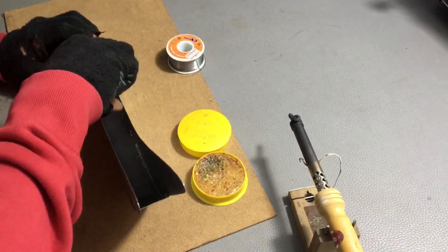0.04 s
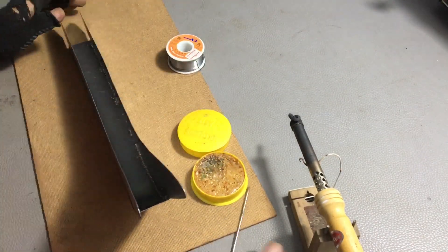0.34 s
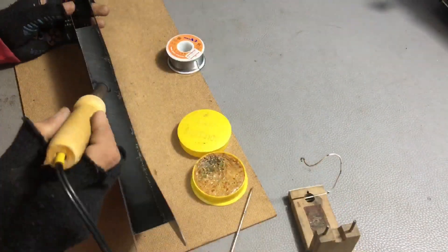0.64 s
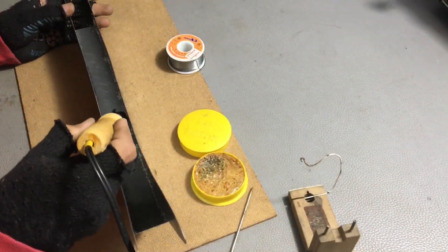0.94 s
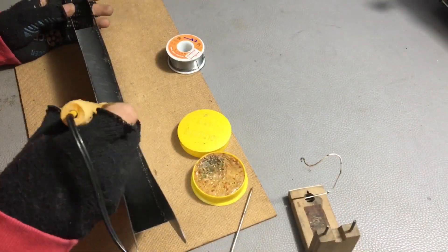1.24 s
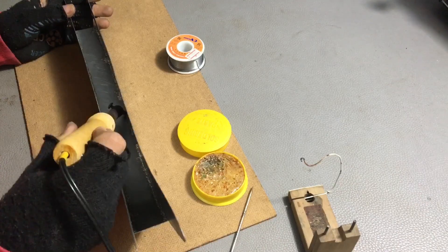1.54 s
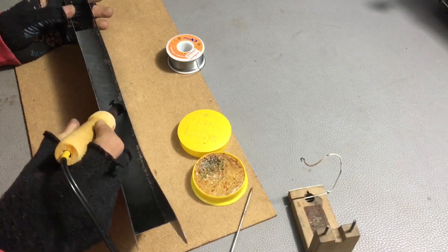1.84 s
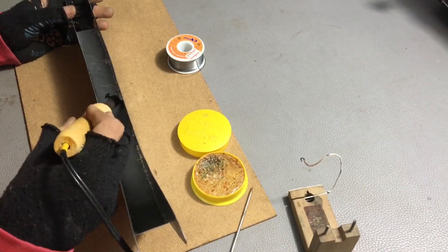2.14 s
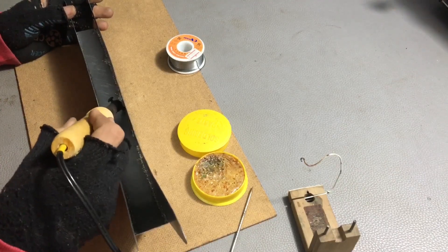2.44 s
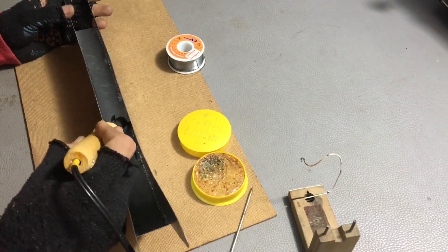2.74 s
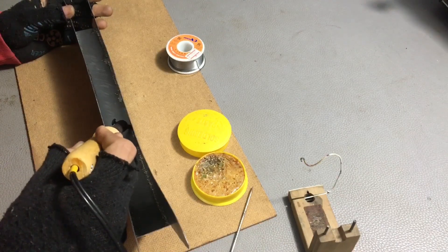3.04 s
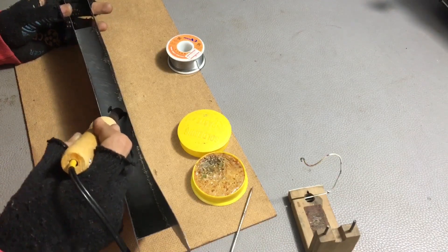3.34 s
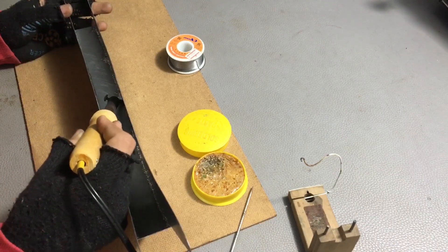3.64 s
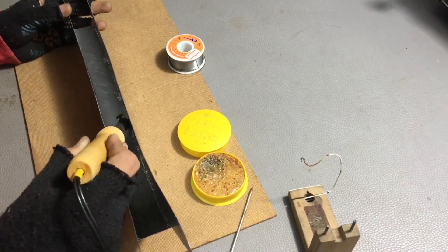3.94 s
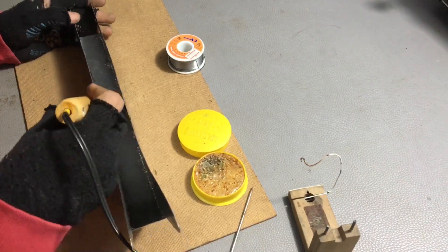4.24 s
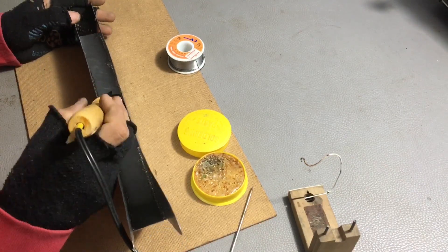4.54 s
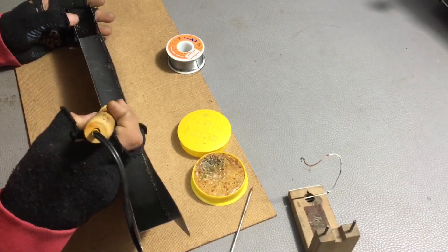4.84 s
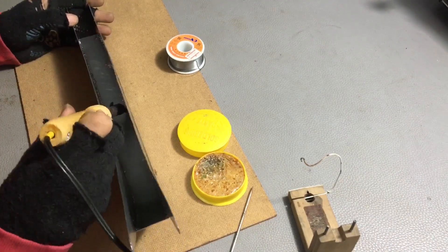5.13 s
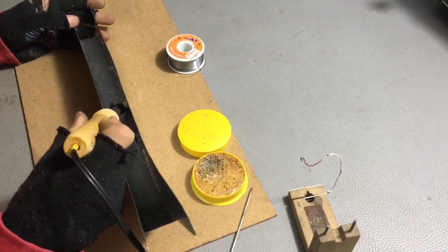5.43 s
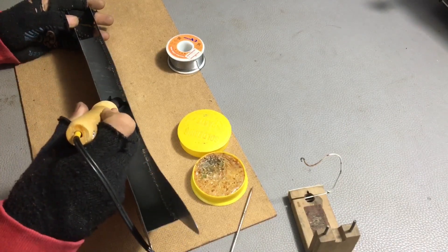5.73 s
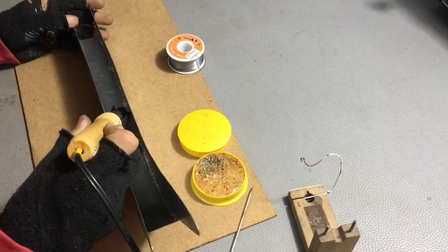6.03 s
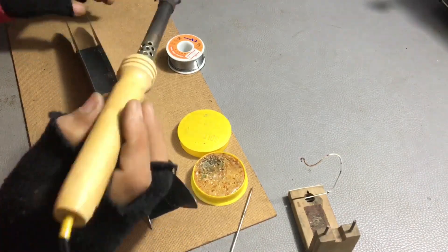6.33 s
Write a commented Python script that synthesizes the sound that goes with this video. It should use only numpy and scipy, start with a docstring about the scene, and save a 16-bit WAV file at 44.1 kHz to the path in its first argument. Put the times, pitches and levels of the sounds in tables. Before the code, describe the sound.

A hot soldering iron pushed through a plastic strip makes short gritty scrapes, thin squeaks and sharp clicks over a faint workshop hum.

```python
"""Short, gritty rasps and thin squeaks: a hot soldering iron is pushed through a plastic strip.
The tip scrapes in and out of the hole and sets the iron's steel barrel ringing; where it sticks and
slips it squeaks, and once, forced through, it squeals. Iron and strip click against each other and
thud on the fibreboard sheet below. Behind it all sits a small workshop's low hum and faint hiss."""
import sys
import numpy as np
from scipy import signal
from scipy.fft import rfft, irfft
from scipy.io import wavfile

SR = 44100
rng = np.random.default_rng(int(sys.argv[2]) if len(sys.argv) > 2 else 0)


def wrap_up_sound(samples):
    """Save the sound to the file named by the first command line argument, as 16-bit audio."""
    columns = np.atleast_2d(samples).T
    # keep every value between -1 and 1, then stretch to whole-number steps
    tamed = np.clip(columns, -1, 1)
    steps = np.round(tamed * 32767).astype(np.int16)
    wavfile.write(sys.argv[1], SR, steps)


N = 285768

# Strokes of the tip, mostly in quick back-and-forth runs.
# Each row: peak time in seconds, level in dB, half length in seconds.
TIP_STROKES = [(.009, -53, 0.015), (0.05, -45.5, 0.011), (0.14, -48.5, .011), (0.46, -58, .013),
               (.66, -59, .06), (0.8, -41, 0.018), (0.846, -45, 0.021), (.89, -54, 0.022),
               (0.995, -52, .016), (1.131, -44.5, 0.0081), (1.19, -42, 0.011), (1.228, -41.5, 0.013),
               (1.267, -36.5, 0.016), (1.301, -55, 0.013), (1.342, -45.5, 0.014), (1.45, -49, 0.011),
               (1.483, -45.5, 0.018), (1.66, -48.5, 0.013), (1.759, -40, 0.014), (1.8, -48.5, .02),
               (1.833, -51.5, 0.014), (1.87, -43, 0.014), (1.968, -43.5, .016), (2.031, -44, .012),
               (2.076, -43, 0.018), (2.125, -38.5, 0.014), (2.162, -43.5, 0.021), (2.241, -53, 0.034),
               (2.537, -43, 0.023), (2.602, -38.5, 0.015), (2.641, -41.5, 0.015), (2.753, -41, 0.012),
               (2.837, -48, 0.017), (2.955, -59.5, 0.016), (3.029, -52.5, 0.0093), (3.225, -41, 0.017),
               (3.274, -43, .018), (3.318, -44, 0.016), (3.363, -39.5, .014), (3.401, -48.5, 0.015),
               (3.542, -38.5, .011), (3.67, -63.5, 0.013), (3.745, -55, .022), (3.869, -53, .032),
               (3.94, -40.5, .013), (3.959, -36.5, .015), (4.165, -37, .011), (4.211, -32, 0.011),
               (4.282, -40, 0.011), (4.438, -51, 0.011), (4.63, -48, .014), (4.692, -45, 0.012),
               (4.742, -53.5, 0.0059), (4.887, -51.5, 0.028), (5.04, -50.5, 0.021), (5.098, -56.5, 0.03),
               (5.146, -39.5, .012), (5.19, -50, 0.027), (5.292, -55, 0.019), (5.333, -51.5, 0.015),
               (5.385, -44.5, .018), (5.422, -41, 0.012), (5.583, -50.5, 0.0071), (5.868, -61, 0.01),
               (5.946, -50.5, 0.012), (6.067, -48.5, 0.011), (6.279, -58, 0.026), (6.462, -53, 0.0086)]
# Brightness of a usual stroke. Each row: time in seconds, treble gain in dB.
STROKE_TREBLE = [(0, -3), (.85, 0.5), (1.11, -14), (1.21, -8), (1.28, 1), (2.2, 0.5), (2.7, -1), (3.4, -1),
                 (4.2, -1.5), (5.2, -5), (6.4, -0.5)]
# Short squeaks. Each row: start and end in seconds, middle pitch in Hz, glide and arch as shares of
# the pitch, fundamental in dB, octave in dB, fall per further harmonic in dB.
SHORT_SQUEAKS = [(0, 0.04, 1210, -0.19, 0.036, -54.5, -52, 10),
                 (.055, 0.134, 1244, -0.072, 0.18, -45.5, -52, 11),
                 (0.547, 0.624, 4000, 0.037, .03, -67, -66, 13),
                 (0.617, 0.656, 4310, 0.063, 0.039, -59.5, -65, 12),
                 (0.663, 0.728, 4370, -0.036, 0.058, -62, -62.5, 8),
                 (2.452, 2.528, 1996, -0.11, 0.027, -61, -56, 2.2),
                 (2.698, 2.746, 1810, -.1, -.05, -66.5, -60, 5),
                 (2.76, 2.84, 1880, -0.18, 0.038, -64.5, -56, 4.5),
                 (2.967, 3.009, 2537, .02, 0.1, -53.5, -58.5, 9.8),
                 (4.237, 4.288, 2250, -0.078, 0.062, -51, -44, 8.8),
                 (4.305, 4.34, 1843, 0.11, 0, -63, -65.5, 9),
                 (4.481, 4.523, 1733, 0.25, .04, -65.5, -66, 3.3),
                 (4.539, 4.615, 1795, -0.36, 0.077, -67, -57.5, 4.8),
                 (4.945, 4.979, 2250, .03, 0.049, -52, -69, 3),
                 (5.181, 5.215, 2374, 0.1, 0.017, -55.5, -46, 7),
                 (5.545, 5.578, 2410, 0.23, .15, -56.5, -49.5, 10),
                 (5.593, 5.618, 1980, -0.16, -0.01, -62.5, -49, 9.8),
                 (5.953, 6.029, 2090, 0, -0.016, -56.5, -59.5, 7.8),
                 (6.12, 6.147, 2190, 0.12, 0.15, -65, -64, 7.6)]
# The long squeal. Each row: time in seconds, pitch in Hz, fundamental and overtones in relative dB.
SQUEAL_PATH = [(4.089, 2420, -41, -50), (4.1, 2150, -49, -28.5), (4.119, 2008, -46.5, -35),
               (4.139, 2185, -44, -31.5), (4.146, 2107, -42, -53), (4.16, 2202, -40.5, -68),
               (4.182, 2227, -41, -61), (4.205, 2097, -46.5, -68), (4.22, 2040, -38.5, -70)]
# Iron against strip. Each row: start in seconds, force in dB, hardness from 0 (plastic) to 1 (steel),
# chatter decay in seconds.
CONTACT_CLICKS = [(0.127, -33.5, 0.23, .0012), (.306, -17, 0.66, 0.0032), (.32, -25, 0.47, 0.0041),
                  (.423, -33.5, 0, 0.0038), (.498, -32, 0.61, .0016), (.508, -27, .55, .0014),
                  (0.52, -24.5, 0.7, 0.0011), (0.717, -25, 0.87, 0.0067), (0.73, -18.5, 0.86, 0.0014),
                  (1.147, -17, 0.68, 0.0015), (1.253, -30.5, 0.73, 0.0045), (1.943, -33.5, 0.63, 0.0042),
                  (2.061, -37, 0.91, 0.0025), (2.197, -39.5, 0.86, 0.005), (2.359, -19.5, 0.69, .0022),
                  (2.466, -30.5, 0.52, .001), (3.21, -31.5, 0.8, 0.015), (3.93, -33.5, 0.98, .0045),
                  (4.062, -21.5, .95, 0.0054), (4.069, -13, 0.77, 0.0043), (4.217, -15, 0.77, 0.0022),
                  (4.287, -37, .5, .004), (4.357, -36.5, 0.47, .008), (4.692, -32.5, 0.31, .006),
                  (4.945, -30, 0.82, .004), (5.001, -33, 0.47, 0.011), (5.144, -33.5, 0.99, 0.0037),
                  (5.231, -35, 0.51, .004), (5.786, -44.5, 0.44, .012), (6.187, -25, 0.79, 0.0053),
                  (6.199, -30, 1, 0.0073)]
# Knocks on the board. Each row: start in seconds, force in dB, centre in Hz.
BOARD_THUDS = [(.308, -38, 630), (.402, -38.5, 524), (.424, -31, 560), (.428, -32, 393), (.731, -35, 400),
               (1.148, -37.5, 406), (2.356, -39.5, 442), (3.543, -40.5, 414), (4.068, -31, 400),
               (4.218, -38, 394), (4.286, -35.5, 381), (4.692, -35.5, 400), (5.001, -27, 560),
               (5.145, -35, 337), (5.231, -42, 576), (5.423, -38.5, 354), (5.749, -45, 596)]
# Brief high pings of the iron. Each row: start in seconds, pitch in Hz, level in dB, T60 in seconds.
IRON_PINGS = [(.7305, 8800, -22, 0.018), (4.067, 9300, -23, 0.038), (5.003, 4480, -48.5, .054),
              (6.187, 5790, -45, .14), (6.189, 8430, -29, 0.028), (6.189, 12050, -32, 0.078),
              (6.199, 13400, -30, 0.051), (6.223, 3460, -49, .04), (6.272, 7540, -52, 0.13),
              (6.304, 3070, -51.5, 0.083)]
# Modes of steel barrel, plastic strip and fibreboard.
# Each row: frequency in Hz, width in Hz, relative level in dB.
BARREL_MODES = [(3625, 58, 2), (3926, 420, -3), (4294, 240, -11.5), (4570, 150, -7.5), (4925, 103, -2.5),
                (5350, 310, -4), (5880, 170, -2.5), (6170, 160, -4.5), (6756, 55, -5), (7654, 94, -7),
                (7776, 130, 0.5), (7970, 280, -12), (7940, 41, -10), (8480, 330, -2.5), (8850, 120, -14),
                (9230, 240, 5), (9750, 160, -8), (10100, 37, -21), (10350, 49, 3), (10820, 440, -7.5),
                (11640, 150, -2), (12130, 160, -1.5), (12800, 300, 0), (13330, 67, -17), (14000, 560, -0.5),
                (14700, 78, -5), (15730, 320, 7.5)]
STRIP_MODES = [(1159, 86, -2.5), (1489, 256, 1.5), (1847, 410, -4.5), (2037, 290, -15.5), (2940, 1380, 0.5)]
BOARD_MODES = [(244, 290, 10.5), (359, 69, 10.5), (449, 31, -1), (620, 33, 6.5)]
# Light rubbing under the strokes. Each row: time in seconds, relative force in dB.
RUB_FORCE = [(0, -53), (.25, -67), (.6, -61.5), (.76, -78), (.96, -57), (1.25, -81.5), (1.58, -61.5),
             (1.85, -74), (2.2, -64), (2.5, -76), (2.85, -64), (3.12, -83), (3.37, -65), (3.8, -64),
             (4.25, -64), (4.7, -72), (5.07, -56.5), (5.5, -69.5), (6.48, -70.5)]
# The room's murmur and hiss. Each row: frequency in Hz, relative spectral level in dB.
AIR_SPECTRUM = [(30, -50), (80, -34), (110, -36.5), (160, -10), (220, 1), (320, -4), (440, 0), (600, -10),
                (750, -17.5), (1150, -20.5), (1600, -24), (8000, -24), (16000, -25.5)]
# The wavering hum. Each row: pitch in Hz, width in Hz, relative level in dB.
HUM_TONES = [(256.2, 20, 3), (416, 20.3, 8.5), (459, 11.7, 5.5)]
# Rise and fall of the low room tone. Each row: time in seconds, relative level in dB.
ROOM_SWELL = [(0.0, -55.5), (0.83, -60), (1.12, -57), (2.89, -59.5), (5.0, -55.5), (5.18, -54), (5.63, -56),
              (6.1, -55), (6.48, -57)]


def strokes(usual_db=-44.5, treble_hz=9200, top_hz=14260, board_db=-21.5):
    """Each scrape swells and fades with the tip's speed; gives forces on board, strip and barrel."""
    forces = np.zeros((3, N))
    split = signal.butter(4, treble_hz, fs=SR, output="sos")
    for s, db, half in TIP_STROKES:
        # a stronger stroke is brighter, and more of it goes into the barrel
        effort_db = db - usual_db
        bright_db = np.interp(s, *np.transpose(STROKE_TREBLE)) + .43 * effort_db
        strip_db = -8.5 - .48 * effort_db
        at = np.arange(max(0, int((s - 2 * half) * SR)), min(N, int((s + 2 * half) * SR)))
        speed = from_db(db) * np.exp(-2 * np.abs((at / SR - s) / half) ** 1.77)
        rasp = friction(len(at), grain_db=2)
        dull = signal.sosfiltfilt(split, rasp)
        coloured = dull + from_db(bright_db) * (rasp - dull)
        on_barrel = rms_one(cut(coloured, top_hz, "low", order=4))
        forces[:, at] += speed * np.array([from_db(board_db) * rasp, from_db(strip_db) * rasp, on_barrel])
    return forces


def friction(size, grain_db):
    """Tiny slips of uneven strength make a grainy noise."""
    return rms_one(rng.standard_normal(size) * from_db(grain_db * drift(size, rate_hz=215)))


def squeaks(usual_db=-54, usual_rough=.13, harmonics=8):
    """Each short squeak glides and arches in pitch with the tip's speed."""
    out = np.zeros(N)
    for start, end, middle_hz, glide, arch, low_db, octave_db, fall_db in SHORT_SQUEAKS:
        at = np.arange(int(start * SR), int(end * SR))
        along = np.linspace(-1, 1, len(at))
        hz = middle_hz * (1 + glide * along / 2 - arch * along ** 2)
        levels = [low_db] + [octave_db - fall_db * k for k in range(harmonics - 1)]
        # a faint squeak barely locks in, so it is rougher
        rough = usual_rough * np.exp(.1 * (usual_db - max(low_db, octave_db)))
        tone = stick_slip(hz, levels, rough, jitter=.012, flutter_db=4)
        out[at] += tone * signal.windows.tukey(len(at), .38)
    return out


def long_squeal(gain_db=1, octave_db=-43.5, fall_db_per_octave=16):
    """Shrill while the tip is forced, then mellow as the plastic gives."""
    times, *columns = np.transpose(SQUEAL_PATH)
    at = np.arange(int(times[0] * SR), int(times[-1] * SR))
    hz, low_db, upper_db = (np.interp(at / SR, times, column) for column in columns)
    overtones = [upper_db - 1.5 - fall_db_per_octave * np.log2(k / 3) for k in range(3, 8)]
    tone = stick_slip(hz, [low_db, octave_db] + overtones, rough=.08, jitter=.0067, flutter_db=2.5)
    out = np.zeros(N)
    out[at] = from_db(gain_db) * tone * signal.windows.tukey(len(at), .08)
    return out


def stick_slip(hz, levels, rough, jitter, flutter_db):
    """The tip sticks and slips periodically; uneven slips smear each harmonic."""
    size, tone = len(hz), 0
    phase = 2 * np.pi * np.cumsum(hz * (1 + jitter * drift(size, rate_hz=118))) / SR
    for k, db in enumerate(levels, 1):
        smear_hz = 300 * np.sqrt(k)
        rasp = drift(size, smear_hz) + 1j * drift(size, smear_hz)
        partial = np.real((1 + rough * rasp) * np.exp(1j * k * phase)) / np.sqrt(.5 + rough ** 2)
        gain = from_db(db + flutter_db * drift(size, rate_hz=53))
        tone = tone + gain * partial * (k * hz < SR / 2)
    return tone


def clicks(snap_s=.0026, soft_hz=1780, hard_hz=15700, swing_db=23.5):
    """A sharp first contact, then a dying chatter of little blows; gives forces on strip and barrel."""
    forces = np.zeros((2, N))
    t = np.arange(SR // 20) / SR
    for s, db, hardness, chatter_s in CONTACT_CLICKS:
        rattle = np.sign(rng.standard_normal(len(t))) * np.exp(-t / chatter_s)
        contact = signal.unit_impulse(len(t)) * np.linalg.norm(rattle)
        # the shorter the chatter, the more of the blow is in the first contact
        share = np.exp(-chatter_s / snap_s)
        blow = np.sqrt(share) * contact + np.sqrt(1 - share) * rattle
        # a softer contact is duller and shakes the strip more than the barrel
        edge_hz = soft_hz + (hard_hz - soft_hz) * hardness ** 1.35
        gains = from_db(db - swing_db * np.array([[hardness], [1 - hardness]]))
        start = int(s * SR)
        forces[:, start:start + len(t)] += gains * cut(blow, edge_hz, "low", order=3)
    return forces


def thuds(settling_s=.0064, push=.99):
    """A soft push and the strip's settling; where it lands decides which board modes are fed most."""
    force = np.zeros(N)
    t = np.arange(SR // 12) / SR
    for s, db, hz in BOARD_THUDS:
        shuffle = rng.standard_normal(len(t)) * np.exp(-t / settling_s)
        blow = shuffle + push * np.linalg.norm(shuffle) * signal.unit_impulse(len(t))
        start = int(s * SR)
        force[start:start + len(t)] += from_db(db) * resonate(blow, hz, width_hz=140) / np.hypot(1, push)
    return force


def pings():
    """Single decaying modes of the iron: the bright ring of hard clicks, and a few faint rings."""
    out = np.zeros(N)
    t = np.arange(SR // 8) / SR
    for s, hz, db, t60 in IRON_PINGS:
        start = int(s * SR)
        out[start:start + len(t)] += from_db(db - 60 * t / t60) * np.sin(2 * np.pi * hz * t)
    return out


def body(force, modes, crack_db, crack_hz, wander_db, min_width_hz=55):
    """The contact's direct crack plus ringing modes, fed unevenly as the contact point moves."""
    out = from_db(crack_db) * cut(force, crack_hz, "high", order=3)
    power = from_db(crack_db) ** 2
    hop = 100  # samples per coupling step
    steps = np.arange(N) / hop
    for hz, width_hz, db in modes:
        width_hz = max(width_hz, min_width_hz)  # a minimum width keeps every ring short
        # each mode's coupling changes about twenty times a second
        coupling = from_db(db + wander_db * drift(N // hop + 2, rate_hz=20 * hop))
        drive = force * np.interp(steps, np.arange(len(coupling)), coupling)
        out = out + resonate(drive, hz, width_hz)
        power += from_db(db) ** 2 * np.pi * width_hz / SR
    return out / np.sqrt(power)


def workshop_reverb(x, t60_s=.064, build_s=.00032):
    """A short, diffuse tail from the bench and near walls."""
    t = np.arange(SR // 3) / SR
    tail = rng.standard_normal(len(t)) * from_db(-60 * t / t60_s) * (1 - np.exp(-t / build_s))
    tail = cut(tail, hz=8600, kind="low", order=1)
    return signal.oaconvolve(x, tail / np.linalg.norm(tail))[:N]


def room_tone(air_db=-58, hum_db=-62):
    """A low murmur and a wavering hum swell together under an even hiss."""
    air_hz, shape_db = np.transpose(AIR_SPECTRUM)
    bins_hz = np.maximum(np.arange(N // 2 + 1) * SR / N, 1)
    spectrum = from_db(np.interp(np.log(bins_hz), np.log(air_hz), shape_db))
    air = from_db(air_db) * rms_one(irfft(rfft(rng.standard_normal(N)) * spectrum, N))
    t = np.arange(N) / SR
    hum = sum(from_db(db) * drift(N, width / 2) * np.sin(2 * np.pi * hz * t)
              for hz, width, db in HUM_TONES)
    murmur = cut(air, hz=890, kind="low", order=1)
    hiss = air - murmur
    swell = gain_curve(ROOM_SWELL, mean_db=.52, depth=.96)
    return (murmur + from_db(hum_db) * rms_one(hum)) * swell + hiss


def resonate(x, hz, width_hz):
    """One resonance with a gain of one at its peak."""
    r = np.exp(-np.pi * width_hz / SR)
    feedback = [1, -2 * r * np.cos(2 * np.pi * hz / SR), r * r]
    return signal.lfilter([(1 - r * r) / 2, 0, (r * r - 1) / 2], feedback, x + 1e-18)


def gain_curve(rows, mean_db, depth):
    """A fader ride through rows of seconds and dB, re-centred on mean_db, its swing scaled by depth."""
    db = np.interp(np.arange(N) / SR, *np.transpose(rows))
    return from_db(mean_db + depth * (db - db.mean()))


def drift(size, rate_hz):
    """A smooth random wobble with an rms of one."""
    return rms_one(cut(rng.standard_normal(size + SR // 4), rate_hz, "low")[SR // 4:])


def cut(x, hz, kind, order=2):
    """Butterworth low- or high-pass."""
    return signal.sosfilt(signal.butter(order, hz, kind, fs=SR, output="sos"), x)


def from_db(db):
    """Decibels to gain."""
    return 10 ** (np.asarray(db) / 20)


def rms_one(x):
    """Scale to an rms of one."""
    return x / np.sqrt(np.mean(x ** 2) + 1e-20)


def scene():
    """Strokes, knocks and rubbing drive three bodies; squeaks sound directly and through the barrel."""
    on_board, on_strip, on_barrel = strokes()
    strip_blows, barrel_blows = clicks()
    rub = gain_curve(RUB_FORCE, mean_db=-70, depth=.99) * friction(N, grain_db=7)
    squeaking = squeaks() + long_squeal()
    on_board = on_board + thuds()
    on_strip = on_strip + strip_blows + from_db(-3) * rub
    # the squeaks' harmonics swell and break as they glide across the barrel's modes
    on_barrel = on_barrel + barrel_blows + rub + from_db(-17) * squeaking
    board = body(on_board, BOARD_MODES, crack_db=-40, crack_hz=600, wander_db=0)
    strip = body(on_strip, STRIP_MODES, crack_db=-11, crack_hz=1550, wander_db=3.5)
    barrel = body(on_barrel, BARREL_MODES, crack_db=-19, crack_hz=4060, wander_db=2.2)
    # each part radiates little outside the range of its modes
    board = cut(board, hz=150, kind="high", order=4)
    board = cut(board, hz=710, kind="low", order=4)
    strip = cut(strip, hz=870, kind="high", order=3)
    barrel = cut(barrel, hz=2534, kind="high", order=4)
    work = board + strip + barrel + squeaking + pings()
    return (work + from_db(-10) * workshop_reverb(work) + room_tone())[None]


def record(dry):
    """A steep low-pass shaves off the top above 15750 Hz."""
    return signal.sosfilt(signal.ellip(12, .1, 80, 15750, fs=SR, output="sos"), dry)


dry = scene()
out = record(dry)
wrap_up_sound(out)
```